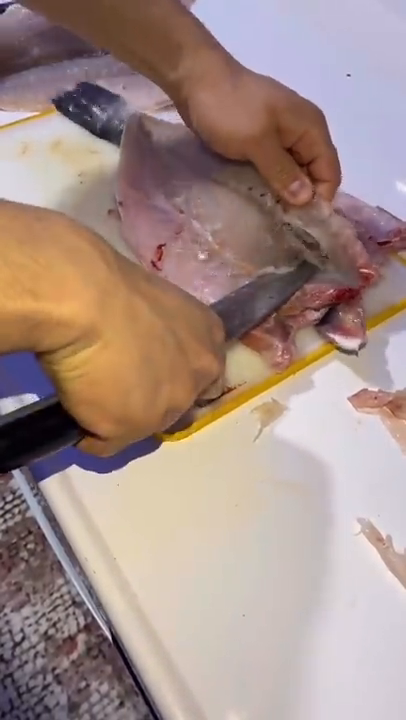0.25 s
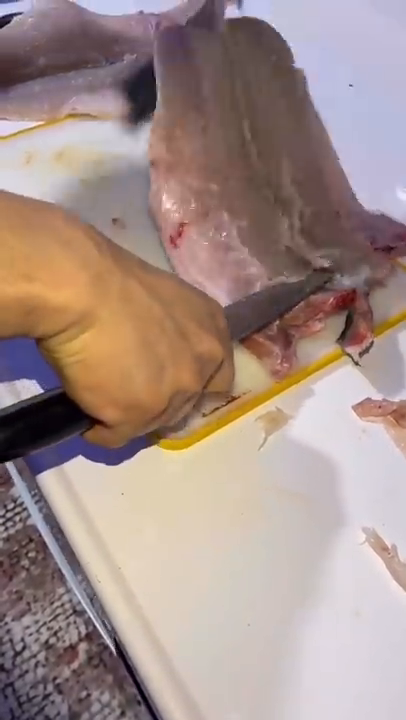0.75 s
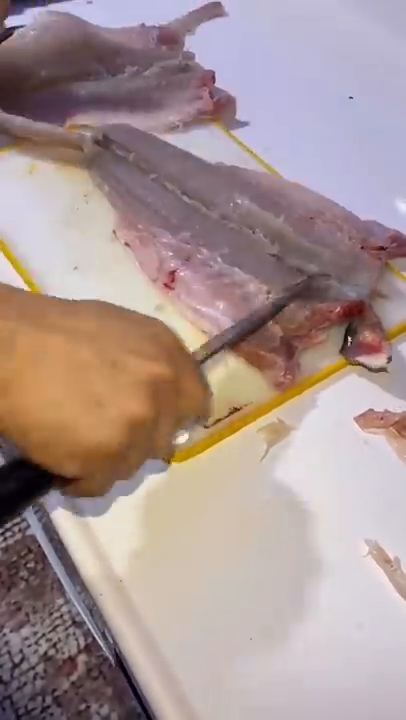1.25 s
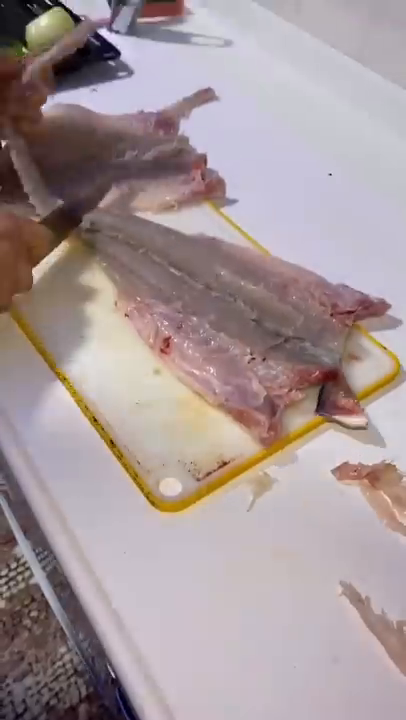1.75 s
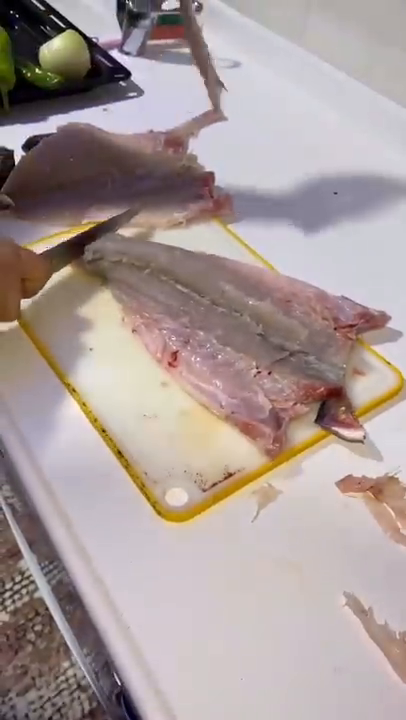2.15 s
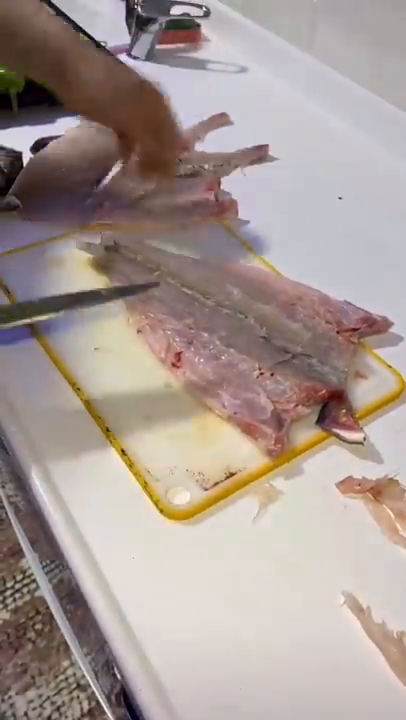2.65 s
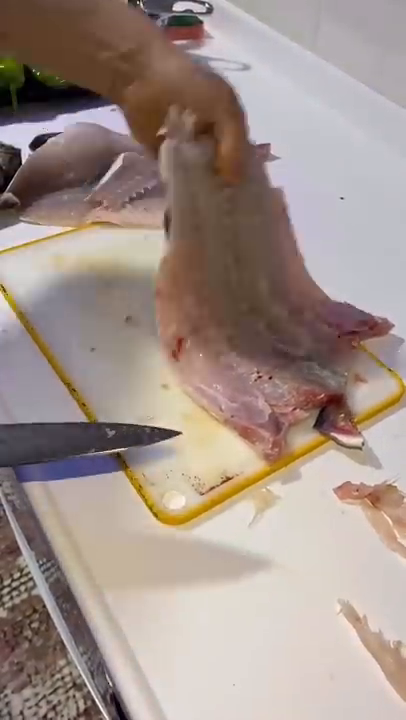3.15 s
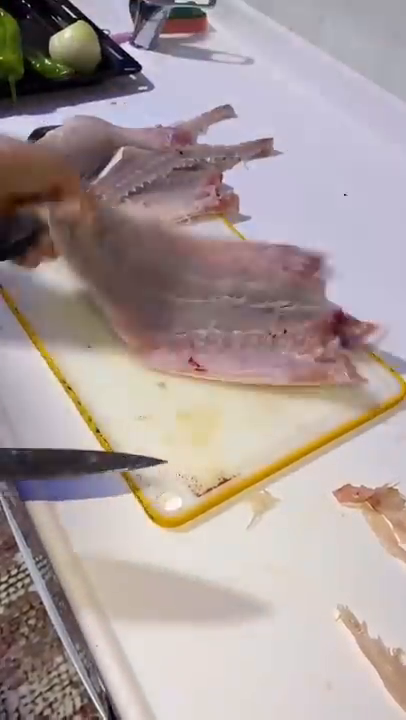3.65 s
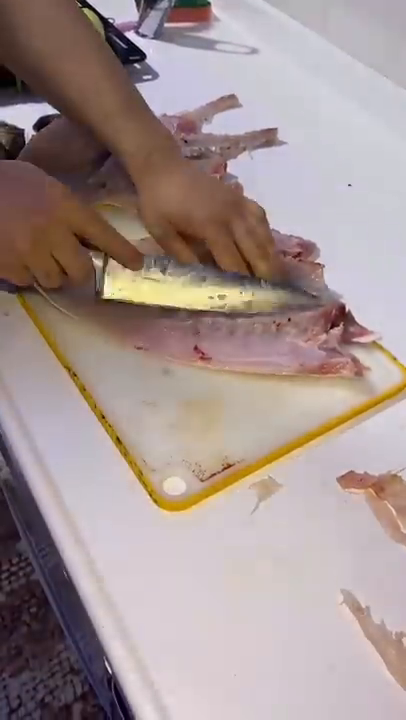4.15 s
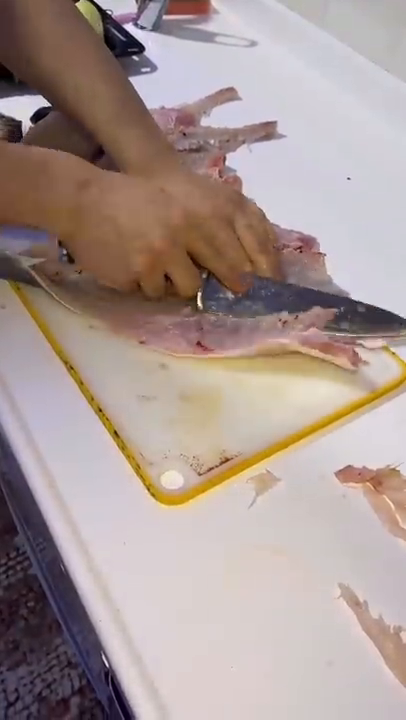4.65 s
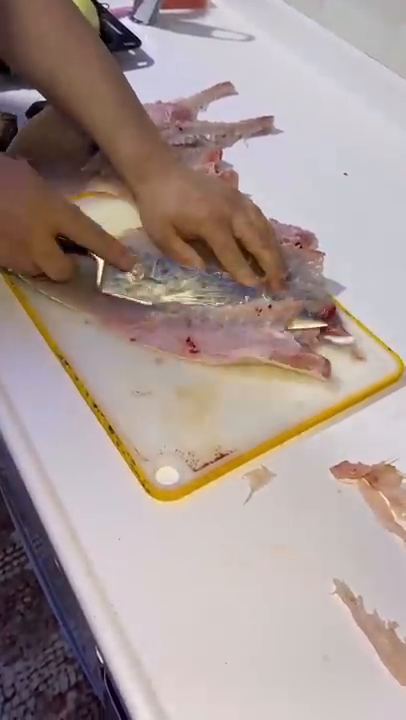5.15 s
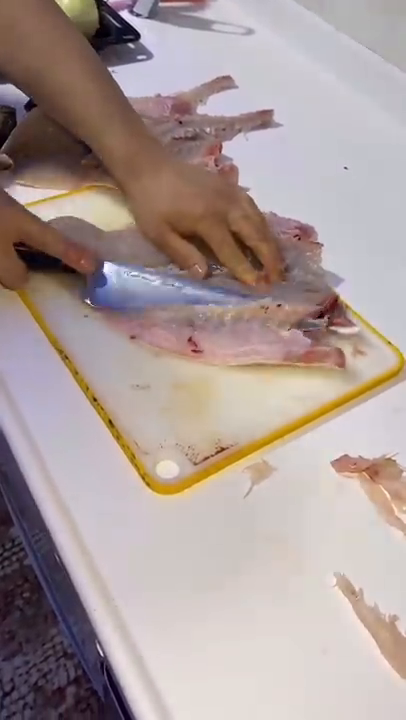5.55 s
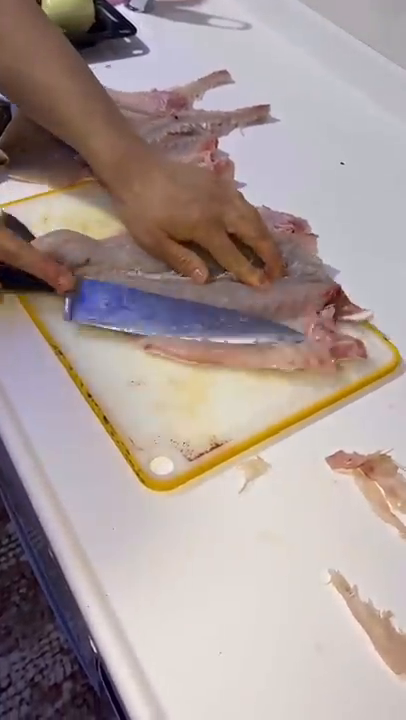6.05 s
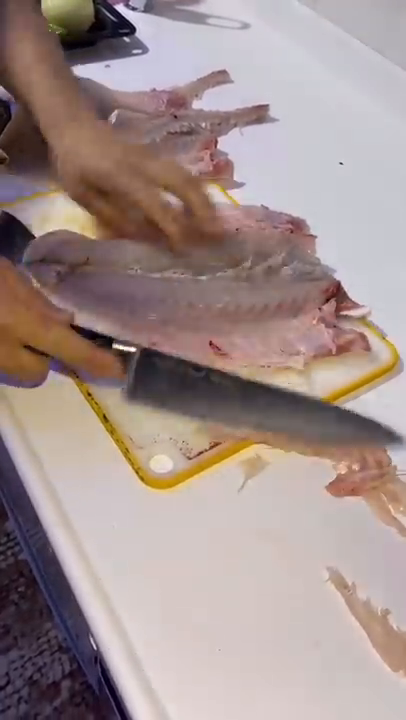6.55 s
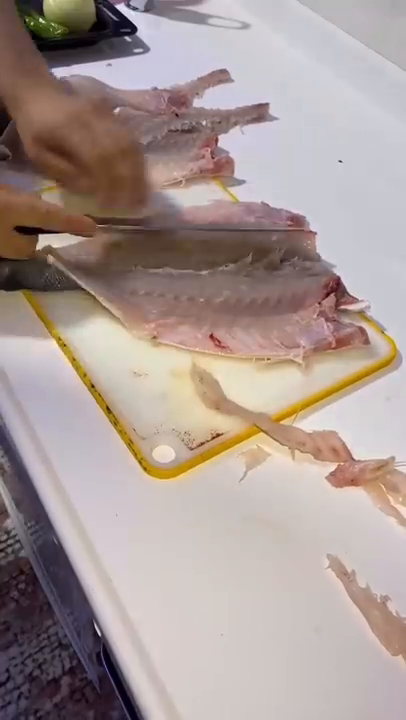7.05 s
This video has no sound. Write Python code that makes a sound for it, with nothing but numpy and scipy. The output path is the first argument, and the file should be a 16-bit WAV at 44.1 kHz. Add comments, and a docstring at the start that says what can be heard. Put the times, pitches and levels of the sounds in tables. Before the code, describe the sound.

Close, brittle crackling of a knife cutting along a fish's backbone leads to a sharp snap and a single hard chop on a plastic board, the loudest sound. The backbone lands on the counter with a dull thump, followed by faint squelches and the wet slap of a fillet. Soft hissing, rasping slices and small rips fill the second half, over the low hum of appliances in a small kitchen.

```python
"""Filleting a fish

In a small kitchen a knife crunches through bones, snaps the spine and chops through the tail onto a
plastic board; the backbone is tossed on the counter. After a jump in time a fillet is slapped down and
the blade shaves off its ribs in wet strokes. Appliances hum. Fracture and friction are filtered showers
of tiny impulses; struck bone, blade and board ring in damped normal modes."""
import sys
import numpy as np
from scipy import signal
from scipy.fft import rfft, irfft, next_fast_len
from scipy.io import wavfile
from scipy.ndimage import map_coordinates

SR = 44100
rng = np.random.default_rng(int(sys.argv[2]) if len(sys.argv) > 2 else 0)


def unload_audio(sound):
    """Save the sound as a 16-bit wav file, at the path given as the first command line argument."""
    columns = np.transpose(np.atleast_2d(sound))
    # keep every value between -1 and 1, then stretch to whole-number steps
    steps = np.round(np.clip(columns, -1, 1) * 32767)
    wavfile.write(sys.argv[1], SR, steps.astype(np.int16))


N = 322350

# Cuts along the backbone and lifts of sticky flesh. Each row: start and length in seconds, level in dB.
CUTS = [(0.0, 0.037, -53), (0.097, 0.23, -51), (0.23, 0.07, -49), (0.419, .025, -44), (0.478, 0.31, -43),
        (0.798, 0.19, -51.5)]
LIFTS = [(1.832, 0.13, -41), (2.051, 0.27, -65), (2.694, 0.28, -60), (2.844, 0.087, -56),
         (2.985, 0.38, -52)]
# Slicing strokes. Each row: start and length in seconds, hiss and rib rasp in dB.
STROKES = [(4.045, 0.09, -66.5, -66), (4.165, 0.12, -65, -62.5), (4.382, 0.16, -65.5, -85),
           (4.551, 0.083, -50, -82), (4.69, 0.26, -57, -65), (4.98, 0.077, -61.5, -81),
           (5.057, 0.16, -69, -74), (5.299, 0.081, -59, -80), (5.414, 0.15, -63, -64.5),
           (5.556, 0.094, -56, -60), (5.689, 0.075, -56.5, -53), (5.813, 0.051, -64, -55),
           (5.949, 0.039, -50, -54), (6.087, 0.14, -57.5, -78), (6.207, 0.059, -53, -67),
           (6.49, 0.033, -76, -63), (6.641, 0.24, -63, -72), (7.003, 0.23, -79.5, -74.5)]
STROKE_SHAPE = dict(attack_s=0.024, ease_db_per_s=16, release_s=0.063)
# Spectra of a soft push and of peeling flesh. Each row: frequency in Hz, relative level in dB.
THUD = [(30, -39.5), (55, 5.5), (75, -1), (130, 1), (200, -3.5), (400, -18.5), (800, -26.5), (2000, -50)]
PEEL = [(400, -0.5), (1200, -8.5), (2700, -12.5), (4000, -15), (6500, -2.5), (9000, -7), (12000, -18.5),
        (15500, -3.5)]
# The board rocks after the chop. Each row: start in seconds, relative level in dB.
REBOUNDS = [(1.7192, -25), (1.748, -31)]


def amp(db):
    """Decibels to amplitude ratio."""
    return 10 ** (np.asarray(db) / 20)


def unit(x):
    """Normalise to rms 1."""
    return x / np.sqrt(np.mean(x ** 2) + 1e-20)


def along(points, hz):
    """Interpolate (Hz, value) points on a logarithmic frequency axis."""
    f, v = np.transpose(points)
    return np.interp(np.log(hz + 1), np.log(f + 1), v)


def clock(size=SR // 4):
    """Seconds since an onset."""
    return np.arange(size) / SR


def add(track, s, sound):
    """Superpose a sound on the track at s seconds."""
    part = track[max(round(s * SR), 0):][:len(sound)]
    part += sound[:len(part)]


def wobble(rate, size=N):
    """Smooth random modulation, rate knots a second."""
    return map_coordinates(rng.standard_normal(int(size * rate / SR) + 4), [np.arange(size) * rate / SR])


def colour(x, spectrum, size=8192):
    """Minimum-phase filter with the given spectrum; white noise keeps its power."""
    gain = unit(amp(along(spectrum, np.fft.rfftfreq(size, 1 / SR))))
    cepstrum = irfft(np.log(np.maximum(gain, 1e-6)))
    cepstrum[1:size // 2] *= 2
    cepstrum[size // 2 + 1:] = 0
    return signal.fftconvolve(x, irfft(np.exp(rfft(cepstrum))))[:len(x)]


def resonate(x, hz, q):
    """Second-order resonator; white noise roughly keeps its power."""
    hz = np.clip(hz, 50, SR / 4)
    return signal.lfilter(*signal.iirpeak(hz, q, SR), x) * np.sqrt(SR * q / (np.pi * hz))


def mode(t, hz, db, t60, phase=0):
    """A normal mode: a sinusoid that decays by 60 dB in t60 seconds."""
    return amp(db - 60 * t / t60) * np.sin(2 * np.pi * hz * t + phase)


def grains(size, rate, spread_db):
    """Shot noise of rms 1: tiny ruptures of uneven strength, on average rate a second."""
    present = rng.random(size) < rate / SR
    strength = amp(spread_db * np.minimum(rng.exponential(size=size), 4))
    return unit(present * strength * np.sign(rng.standard_normal(size)))


def burst(rise, t60, rate=9000, spread_db=3):
    """Shot noise with an exponential rise and decay."""
    t = clock()
    envelope = (1 - np.exp(-t / rise)) * amp(-60 * t / t60)
    return envelope / envelope.max() * grains(len(t), rate, spread_db)


def swell(length, rate=3000, spread_db=3):
    """Shot noise under a half-sine envelope."""
    progress = np.minimum(clock() / length, 1)
    return np.sin(np.pi * progress) * grains(len(progress), rate, spread_db)


def gestures(rows, attack_s, ease_db_per_s=42, release_s=0.24):
    """Envelope of hand movements: each rises, eases off, then loses a further 60 dB over the release."""
    gain, t = np.zeros(N), clock(SR)
    for s, length, db in rows:
        fall_db = ease_db_per_s * t + 60 * np.maximum(t - length, 0) / release_s
        add(gain, s, np.minimum(t / attack_s, 1) * amp(db - fall_db))
    return gain


def appliances(air, hum, air_db, hum_db):
    """Moving air gives broadband noise; motors give tones that drift slightly in phase."""
    t = clock(N)
    tones = sum(amp(db) * np.sqrt(2) * np.sin(2 * np.pi * hz * t + 0.22 * wobble(8.5)) for hz, db in hum)
    return amp(air_db) * unit(colour(rng.standard_normal(N), air)) + amp(hum_db) * tones


def tearing():
    """Rupture of fibres: cut flesh crackles in clumps, lifted flesh hisses, and single strands snap."""
    # Each row: frequency in Hz, relative level in dB.
    tear_spectrum = [(300, 1.3), (1000, 1.0), (2000, -5.5), (4000, -7.5), (6500, -5.0), (9000, -21.0),
                     (12000, -9.5), (15500, -8.0)]
    cut, lift = gestures(CUTS, attack_s=0.024), gestures(LIFTS, attack_s=0.054)
    strands = .7 * grains(N, rate=55, spread_db=2)
    crackle = unit(grains(N, rate=1800, spread_db=3.8) * amp(3 * wobble(70)))
    cling = unit(grains(N, rate=2500, spread_db=3.5) * amp(3 * wobble(40)))
    return amp(-2) * cut * colour(crackle + strands, tear_spectrum) + lift * colour(cling + strands, PEEL)


def fine_snaps(per_move=2, scatter_db=3.5, ease_db_per_s=26, centre_hz=865):
    """Random fracture of fine bones, weaker as the hand eases off; returns rows for bones()."""
    moves = np.repeat([row[:3] for row in CUTS + LIFTS + STROKES], per_move, axis=0)
    start, length, db = moves.T
    when, size, pitch = rng.random((len(moves), 3)).T
    db = db + scatter_db * (2 * size - 1) - ease_db_per_s * when * length
    return list(zip(start + when * length, db + 6, db - 3, centre_hz * 2 ** (pitch - .5)))


def bones():
    """Brittle fracture: fibres strain, then each bone clicks, crumbles and rings briefly."""
    # Larger bones. Each row: time in seconds, relative click and ring levels in dB, ring pitch in Hz.
    snaps = [(0.0357, -35, -50, 824), (0.0937, -28, -32.5, 850), (0.1227, -36, -48, 3000),
             (0.1415, -38, -28.5, 1430), (0.2324, -31, -28.5, 796), (0.2466, -29, -29, 4000),
             (0.2543, -36, -25.5, 1610), (0.291, -36, -36, 2200), (0.295, -46, -37.5, 810),
             (0.3267, -35, -54, 830), (0.398, -28, -42, 740), (0.4238, -25, -23.5, 2600),
             (0.4799, -26, -38.5, 780), (0.4826, -28.5, -29, 950), (0.516, -26.5, -29, 2280),
             (0.5314, -37, -33.5, 847), (0.5834, -39, -36.5, 880), (0.663, -47, -43, 1060),
             (1.8504, -25, -40, 1490), (1.9076, -24, -33, 4060), (1.9589, -24.5, -28, 1500),
             (2.055, -32, -51, 1230), (4.777, -38.5, -37, 4100), (5.1604, -56, -46.5, 873),
             (5.6151, -42, -37, 1900), (6.0809, -33, -34, 2550), (6.2072, -36, -36, 1880),
             (6.4973, -46.5, -53, 698), (6.8539, -47, -61, 1320), (7.202, -47, -51, 1126)]
    # Each row: frequency in Hz, relative level in dB.
    click_spectrum = [(300, -14.0), (900, -1.5), (3500, -11.5), (6000, -1.5), (8000, -4.5), (10000, -3.5),
                      (12500, -0.5), (15500, -1.5)]
    ring_spectrum = [(100, -12.5), (550, -1), (850, 6), (1500, -4), (3000, 5), (15000, -2.5)]
    clicks, rings = np.zeros(N), np.zeros(N)
    for s, click_db, ring_db, hz in snaps + fine_snaps():
        add(clicks, s - .008, amp(click_db - 22) * swell(0.0065))  # strain
        add(clicks, s + 0.00062, amp(click_db + 3) * burst(.0001, 0.0045, rate=22000, spread_db=-1))
        add(clicks, s, amp(click_db - 1) * burst(0.00021, 0.026))  # crumbling
        add(rings, s - .01, amp(ring_db - 24) * resonate(swell(0.035), hz, q=3))  # flesh grinds
        add(rings, s, amp(ring_db - 5) * resonate(burst(0.00022, 0.028), hz, q=3))
    return colour(clicks, click_spectrum) + colour(rings, ring_spectrum)


def ticks():
    """Impulse excitation: the edge flicks off a rib or a strand lets go, with a sharp wet tick."""
    # Each row: time in seconds, relative level in dB, resonance in Hz.
    releases = [(0.052, -29.5, 7000), (0.255, -22, 4100), (0.347, -27.5, 5100), (0.4244, -29, 6000),
                (0.465, -27, 5500), (0.4755, -25, 6000), (0.497, -24, 7000), (2.163, -53.5, 8000),
                (2.215, -37.5, 7000), (2.449, -56, 10000), (4.028, -39.5, 11000), (4.063, -40.5, 8060),
                (4.4625, -37, 8100), (4.4836, -20.5, 10000), (4.5603, -39, 10000), (4.5815, -43, 9900),
                (4.6948, -38, 11000), (4.7777, -20.5, 4400), (5.0001, -36, 10070), (5.018, -25.5, 8000),
                (5.1196, -44, 10250), (5.2543, -40.5, 9000), (5.549, -36.5, 7070), (5.6164, -25.5, 9000),
                (5.8635, -43, 5000), (6.000, -33, 2200), (6.05, -36, 8000), (6.087, -22, 2500),
                (6.206, -33, 10500), (6.895, -40, 10620)]
    out = np.zeros(N)
    for s, db, hz in releases:
        release = burst(.0001, 0.002, rate=22000, spread_db=4)
        release[0] += 6
        add(out, s, amp(db - 10.5) * resonate(release, hz, q=1.7))
    return out


def cracks():
    """Free vibration: a thick bone breaks through and its halves ring, the higher modes more briefly."""
    # Each row: time in seconds, level in dB, the lowest mode's frequency in Hz and t60 in seconds.
    breaks = [(0.2335, -38.5, 860, 0.013), (0.2549, -28, 997, 0.024), (0.2935, -35, 1460, 0.035),
              (0.4241, -18, 2035, 0.012), (0.4267, -28, 2784, 0.018), (0.4828, -32, 930, .016),
              (0.5314, -31, 889, 0.022), (1.917, -34, 1780, .02), (2.0563, -43, 1180, .025),
              (5.6244, -35, 2030, .02), (5.9995, -28.5, 1530, 0.0077), (6.225, -33, 750, 0.03)]
    # Each row: multiple of the lowest frequency, relative level in dB.
    bone_modes = [(1, -2), (1.58, -4.5), (2.4, -10), (3.85, -8.5)]
    out, t = np.zeros(N), clock()
    for s, db, hz, t60 in breaks:
        ring = sum(mode(t, hz * ratio, mode_db + rng.normal(0, 1), t60 / np.sqrt(ratio))
                   for ratio, mode_db in bone_modes)
        add(out, s, amp(db) * (1 - np.exp(-t / .0003)) * ring)
    return out


def knife():
    """Damped impacts: soft pushes thud on the board, and light knocks ring the blade."""
    # Each row: start in seconds, relative level in dB, frequency in Hz.
    pushes = [(0.247, -38.5, 128.6), (0.484, -41, 75.3), (0.531, -38, 96), (1.911, -31.5, 106),
              (1.961, -39, 126), (4.579, -40.5, 232), (4.8, -47, 105), (5.491, -45, 80), (5.619, -43.5, 80),
              (5.709, -42.5, 88), (5.99, -36, 87), (6.225, -35.5, 88.3), (6.514, -40.5, 88.7),
              (6.909, -45, 99.5)]
    # Each row: start in seconds, the knock's relative level in dB, frequency in Hz and t60 in seconds,
    # the ring's level in dB and centre in Hz.
    taps = [(1.2705, -27, 940, 0.006, -61, 5800), (1.272, -25, 700, 0.014, -75, 2800),
            (1.9595, -31, 1770, 0.028, -52, 2900), (1.9615, -28, 1042, 0.034, -42.5, 4300),
            (2.247, -54, 830, 0.016, -55, 1700), (2.715, -34, 960, .012, -74, 1500),
            (4.821, -36, 1030, 0.015, -65, 1000)]
    rubs, knocks, t = np.zeros(N), np.zeros(N), clock()
    for s, db, hz in pushes:
        add(rubs, s, amp(db - 3) * burst(0.015, 0.16))
        add(knocks, s, 2 * (1 - np.exp(-t / 0.0087)) * mode(t, hz, db, t60=0.16))
    for s, knock_db, knock_hz, t60, ring_db, ring_hz in taps:
        add(knocks, s, 2 * (1 - np.exp(-t / 0.0032)) * mode(t, knock_hz, knock_db, t60))
        add(knocks, s, amp(ring_db) * blade(ring_hz))
    return colour(rubs, THUD) + knocks


def spine():
    """Stress release: the spine creaks, parts with a double crack and jolts the board."""
    # Each row: frequency in Hz, relative level in dB.
    crack_spectrum = [(40, -21), (130, 1.5), (300, -5.5), (600, -10), (1000, -5.5), (1400, 1), (1750, 1.5),
                      (2300, -13.5), (3200, -11.5), (4200, -15), (6000, -8.5), (8000, -14.5), (12500, -24),
                      (15500, -19.5)]
    crack, jolt = np.zeros(N), np.zeros(N)
    add(crack, 1.070, amp(-41.5) * swell(0.021))
    add(crack, 1.0817, amp(-13) * burst(0.00067, 0.013, rate=15000, spread_db=9))
    add(crack, 1.0852, amp(-21) * burst(0.00066, 0.031, rate=31000, spread_db=-3))
    add(jolt, 1.084, amp(-39) * board(contact_hz=702))
    return colour(crack, crack_spectrum) + jolt


def board(contact_hz):
    """Modal response: a soft contact spares the high modes; the shaking fish unsettles their phase."""
    # Each row: frequency in Hz, level in dB, t60 in seconds.
    board_modes = [(88, 7.5, 0.071), (119, -9.5, 0.2), (136, -2.5, 0.6), (283.9, -7, 0.26),
                   (327.4, 4.5, 0.21), (374, -14.5, 0.25), (441, -21, 0.2), (549, -15.5, 0.24),
                   (654, -17, 0.28), (770, -13.5, .13), (844, -9.5, 0.21), (950, -11, 0.24),
                   (942, -8.5, 0.12), (1070, -14, 0.37), (1197, -13.5, 0.11), (1394, -14.5, 0.095)]
    ring, t = np.zeros(SR), clock(SR)
    for k, (hz, db, t60) in enumerate(board_modes):
        excitation = (-1) ** k / np.hypot(1, hz / contact_hz)
        ring += excitation * mode(t, hz, db + rng.normal(0, 1), t60, phase=.22 * wobble(90, SR))
    return ring * (1 - np.exp(-t / 0.0012))


def blade(centre_hz, width_octaves=0.82):
    """Modal response: the point of contact selects the blade's modes; wet flesh makes them buzz."""
    # Each row: frequency in Hz, level in dB, t60 in seconds.
    blade_modes = [(807, 6, 0.19), (1475, -2, 0.18), (2880, 3.5, 0.071), (4073, 1.5, 0.067),
                   (5000, -1, 0.085), (6440, -4.5, 0.064)]
    ring, t = 0, clock()
    for hz, db, t60 in blade_modes:
        excitation = np.exp(-.5 * (np.log2(hz / centre_hz) / width_octaves) ** 2)
        ring += excitation * mode(t, hz, db + rng.normal(0, 1), t60, phase=.55 * wobble(300, len(t)))
    return ring


def chop():
    """Broadband impact: the blade crunches through the tail into the board, which rocks on the counter."""
    # Each row: frequency in Hz, relative level in dB.
    crunch_spectrum = [(100, -10.5), (400, -11.5), (900, 3.5), (1600, -5.5), (3000, -10.5), (6000, -15),
                       (10000, -20), (15500, -20)]
    impact_spectrum = [(25, -41.5), (70, -11.5), (200, -7), (450, -7.5), (700, -1.5), (950, 2),
                       (1350, -2.5), (1800, -11.5), (2400, -16), (3400, -17.5), (5000, -18.5),
                       (8000, -20.5), (12000, -33.5), (15500, -37)]
    counter_spectrum = [(40, -39), (100, -5.5), (138, -4), (195, -7.5), (260, -4), (330, 0.5), (430, -6.5),
                        (600, -3), (950, -7.5), (1400, -17.5), (2500, -40)]
    out, rocking = np.zeros(N), np.zeros(N)
    add(out, 1.650, amp(-24.5) * colour(swell(0.016, rate=2500), crunch_spectrum))
    add(out, 1.658, amp(-22.5) * colour(swell(0.031, rate=5000), THUD))
    add(out, 1.668, amp(-8.5) * colour(burst(.0015, 0.042), impact_spectrum))
    add(rocking, 1.675, amp(-15.5) * burst(0.0022, 0.074))
    for s, db in REBOUNDS:
        add(rocking, s, amp(db) * burst(0.0015, 0.15))
    return out + colour(rocking, counter_spectrum)


def clack(hz=2840, length_s=0.01):
    """Contact damping: the blade rings for an instant in the chop, until board and flesh choke it."""
    out, t = np.zeros(N), clock()
    envelope = np.sin(np.pi * np.minimum(t / length_s, 1)) ** 2
    add(out, 1.667, amp(-12) * envelope * np.sin(2 * np.pi * hz * t))
    return out


def board_ring():
    """Free decay: the board rings after the chop and again, softly, at each rebound."""
    out = np.zeros(N)
    add(out, 1.671, amp(-12) * board(contact_hz=3900))
    for s, db in REBOUNDS:
        add(out, s, amp(db - 3) * board(contact_hz=500))
    return out


def squelches():
    """Cavity resonance: tiny bubbles burst inside a wet pocket and ring it."""
    # Each row: start in seconds, level in dB, resonance in Hz, length in seconds.
    pockets = [(1.941, -41, 2760, 0.023), (2.774, -45, 1010, 0.031), (2.863, -56, 2600, 0.014),
               (2.905, -64.5, 5360, 0.027), (2.991, -55, 3550, 0.015), (3.047, -59.5, 4200, 0.068),
               (4.566, -51.5, 607, 0.07), (4.591, -59, 1270, 0.044), (6.582, -55, 1490, 0.028),
               (6.629, -54, 1570, 0.086), (6.846, -62.5, 2200, 0.025)]
    out = np.zeros(N)
    for s, db, hz, length in pockets:
        add(out, s, amp(db) * resonate(swell(length, rate=980), hz, q=4))
    return out


def landings():
    """Inelastic impacts: the backbone drops on the counter; the wet fillet slaps the board."""
    # Each row: frequency in Hz, relative level in dB.
    backbone_spectrum = [(40, -19), (70, 6.5), (140, -4), (220, -10.5), (450, -5.5), (900, -12.5),
                         (1600, -9), (3000, -19), (5500, -16.5), (9000, -27.5), (15500, -32)]
    fillet_spectrum = [(40, -13.5), (90, 2), (300, -1), (600, -6), (950, -10), (1600, -6.5), (3000, -8.5),
                       (5000, -12), (8000, -11), (11000, -6), (15500, -17)]
    out = np.zeros(N)
    add(out, 2.531, amp(-37) * colour(swell(0.0085), PEEL))
    add(out, 2.539, amp(-21) * colour(burst(0.00043, 0.045), backbone_spectrum))
    add(out, 3.625, amp(-29.5) * colour(burst(0.0025, 0.14, rate=2700, spread_db=2), fillet_spectrum))
    return out


def thump():
    """Mass on a spring: the backbone's weight rocks the counter on its legs."""
    # Each row: frequency in Hz, relative level in dB, t60 in seconds.
    leg_modes = [(48.5, -9, 0.5), (72, -8, .07), (127.6, 2.5, 0.11)]
    out, t = np.zeros(N), clock(SR // 2)
    for hz, db, t60 in leg_modes:
        add(out, 2.546, (1 - np.exp(-t / 0.004)) * mode(t, hz, db - 28, t60))
    return out


def pop(sag_per_s=4):
    """Cavity resonance: a wet pocket snaps open under the fingers; its pitch sinks as it widens."""
    # Each row: starting frequency in Hz, relative level in dB, t60 in seconds.
    pocket_modes = [(1218, 0, 0.034), (2050, -3.5, 0.025), (3050, -9, 0.025)]
    out, t = np.zeros(N), clock()
    slowed_time = (1 - np.exp(-sag_per_s * t)) / sag_per_s
    for hz, db, t60 in pocket_modes:
        envelope = amp(db - 35 - 60 * t / t60) * (1 - np.exp(-t / .0008))
        add(out, 2.7755, envelope * np.sin(2 * np.pi * hz * slowed_time))
    return out


def slicing(resting_db=-89):
    """Stick-slip friction: the blade hisses in flesh and rasps on ribs; fingers keep a faint crackle."""
    # Each row: frequency in Hz, relative level in dB.
    flesh_spectrum = [(400, 10), (1200, 4.5), (2000, 0.5), (2900, 3.5), (4000, 8), (4800, 1.5), (7500, 0.5),
                      (10000, 7), (13000, 2.5), (15500, -4)]
    rib_spectrum = [(500, -62), (1000, -8), (1600, -0.5), (2300, 1), (3200, -16), (6000, -15)]
    through_flesh = gestures([(s, length, db) for s, length, db, _ in STROKES], **STROKE_SHAPE)
    on_ribs = gestures([(s, length, db) for s, length, _, db in STROKES], **STROKE_SHAPE)
    grip = amp(2.9 * wobble(60))  # the edge catches and slips
    hiss = colour(unit(grip * grains(N, rate=4500, spread_db=3.5)), flesh_spectrum)
    strands = amp(-8) * colour(grains(N, rate=110, spread_db=1.5), flesh_spectrum)
    rasp = colour(unit(grip * grains(N, rate=1800, spread_db=1.5)), rib_spectrum)
    return (through_flesh + amp(resting_db)) * (hiss + strands) + on_ribs * rasp


def rips():
    """Rapid rupture: the edge rips through ribs and skin; wetter tissue sizzles more."""
    # Each row: start in seconds, relative level in dB, half the t60 in seconds, gain above 10 kHz in dB.
    tears = [(4.54, -45, 0.033, 4), (4.567, -38.5, 0.054, 5), (5.008, -41.5, 0.014, 4),
             (5.312, -42, 0.023, -6), (5.615, -36, 0.035, -9), (5.853, -27.5, 0.022, 2.5),
             (5.974, -40.5, 0.052, 3), (6.082, -30.5, 0.027, -24), (6.213, -27, 0.028, -31)]
    # Each row: frequency in Hz, relative level in dB.
    rip_spectrum = [(300, 0.5), (700, -3.5), (1100, -2), (1700, 0.5), (2400, -3), (3300, -6), (5000, -3.5),
                    (7500, -7), (10000, -1), (13000, 6.5), (15500, -5.5)]
    out, highpass = np.zeros(N), signal.butter(2, 10000, "high", fs=SR)
    for s, db, half_t60, sizzle_db in tears:
        rip = burst(0.016, 2 * half_t60, rate=2300, spread_db=3.5)
        treble = signal.filtfilt(*highpass, rip, padtype=None)
        add(out, s, amp(db - 3) * (rip - treble + amp(sizzle_db) * treble))
    return colour(out, rip_spectrum)


def slides():
    """Forced vibration: friction on bone keeps one narrow resonance of the blade sounding."""
    # Each row: start and length in seconds, level in dB, resonance in Hz.
    glides = [(4.757, 0.18, -65.5, 4050), (5.41, 0.21, -69.5, 4060), (5.61, 0.018, -46, 2070),
              (5.698, 0.043, -57.5, 1940), (5.961, 0.037, -47, 2540), (6.938, 0.43, -76.5, 3340)]
    out = np.zeros(N)
    for s, length, db, hz in glides:
        stroke = gestures([(s, length, db)], **STROKE_SHAPE)
        out += stroke * resonate(grains(N, rate=1800, spread_db=7), hz, q=9)
    return out


def reflections(near_db, tail_db, near_t60):
    """Impulse response: early reflections from counter and wall, then the kitchen's diffuse tail."""
    # Each row: frequency in Hz, t60 in seconds.
    reverb_times = [(100, 0.78), (400, .55), (1000, 0.29), (3000, 0.23), (7000, 0.22), (15000, 0.017)]
    size = SR * 2 // 3
    hz, t, noise = signal.stft(rng.standard_normal(size), SR, nperseg=256)
    decay = amp(-60 * t / along(reverb_times, hz)[:, None])
    tail = signal.istft(noise * decay, SR, nperseg=256)[1][:size]
    tail *= 1 - np.exp(-clock(size) / 0.0013)
    response = amp(tail_db) * tail / np.linalg.norm(tail)
    near = burst(0.0007, near_t60)
    add(response, 0, amp(near_db) * near / np.linalg.norm(near))
    return response


def room(x, near_db, tail_db, near_t60):
    """Time-varying reverberation, weak in the bass: moving hands and fish change the reflections."""
    out, hop = np.zeros(N + SR), SR // 6
    padded = np.pad(x, (hop, 2 * hop))
    window = np.sin(np.pi * np.arange(2 * hop) / (2 * hop))
    for i in range(0, N + hop, hop):
        response = reflections(near_db, tail_db, near_t60)
        add(out, i / SR, signal.fftconvolve(window * padded[i:i + 2 * hop], response))
    return signal.lfilter(*signal.butter(2, 170, "high", fs=SR), out[hop:hop + N])


def ports(common, diffuse, table):
    """Phase-difference stereo: two microphone ports share one sound but get different reflections."""
    size = next_fast_len(N + SR // 2)
    hz, table = np.fft.rfftfreq(size, 1 / SR), np.array(table)
    turn = np.exp(1j * along(table[:, :2], hz) / 2)
    mid = rfft(common, size)
    side = rfft(diffuse, size) * amp(along(table[:, ::2], hz))
    return irfft(np.array([(mid + side) * turn, (mid - side) / turn]), size)[:, :N]


def scene(jump_s=3.6):
    """Superposition of knife work, appliances and room, before and after the jump in time."""
    # Air spectra and motor tones. Each row: frequency in Hz, relative level in dB.
    air_early = [(22, -20.5), (48, 1), (75, -10), (110, -1), (160, -12), (230, -12.5), (350, -16),
                 (550, -16), (800, -25.5), (1500, -38.5), (4000, -49.5), (12000, -47.5)]
    air_late = [(35, -28), (65, 4.5), (110, -4), (165, 1), (250, -7.5), (380, -8), (650, -12), (900, -12.5),
                (1400, -24.5), (2600, -32), (3300, -35), (5000, -43), (9000, -39.5), (13000, -40)]
    hum_early = [(48.4, -62), (107.7, -60.5), (220.7, -64.5), (263.8, -69.5)]
    hum_late = [(161.5, -55.5), (236.9, -70.5), (317.6, -62), (382.2, -64), (640.6, -68.5)]
    # Each row: frequency in Hz, phase lead of the left port in radians, diffuse part in dB.
    ports_early = [(80, 0, -28), (300, -.05, -12), (600, -.4, -9), (1100, -.6, -9), (1900, 0, -10),
                   (2800, 1.3, -5), (4000, 1.1, -2), (5500, 1.8, -6), (7000, 1.9, -6), (10000, 3.1, -18),
                   (12500, 3.2, -18), (15500, 4.3, -8)]
    ports_late = [(80, 0, -28), (300, -.05, -12), (1100, -.5, -8), (2800, 0, -13), (4000, 1.3, -8),
                  (5700, 1.2, -1), (8000, 1.5, -4), (10500, 2.1, -9), (12500, 3.1, -18)]
    late = np.clip((clock(N) - jump_s) * 100, 0, 1)  # 10 ms crossfade
    work = bones() + cracks() + spine() + chop() + landings() + thump() + pop() + rips() + ticks()
    work = work + knife() + squelches() + tearing() + late * slicing() + slides()
    background = (1 - late) * appliances(air_early, hum_early, air_db=-53.5, hum_db=3)
    background += late * appliances(air_late, hum_late, air_db=-54, hum_db=-2.5)
    ring = board_ring()
    sent_to_room = work + amp(-5.5) * ring  # the board's ring stays mostly dry, with only a little reverberation
    direct = work + ring + clack() + background
    common = direct + room(sent_to_room, near_db=-14, tail_db=-9, near_t60=0.016)
    diffuse = room(sent_to_room + background, near_db=0.5, tail_db=-6.5, near_t60=0.004)
    return (1 - late) * ports(common, diffuse, ports_early) + late * ports(common, diffuse, ports_late)


def record(dry):
    """Soft saturation rounds the highest peaks; band limiting keeps 35 Hz to 15.8 kHz."""
    rounded = dry / (1 + np.abs(dry / .93) ** 6) ** (1 / 6)
    rounded = signal.lfilter(*signal.butter(3, 35, "high", fs=SR), rounded)
    size = next_fast_len(N + SR // 2)
    hz = np.fft.rfftfreq(size, 1 / SR)
    return irfft(rfft(rounded, size) / np.hypot(1, (hz / 15800) ** 90), size)[:, :N]


dry = scene()
out = record(dry)
unload_audio(out)
```